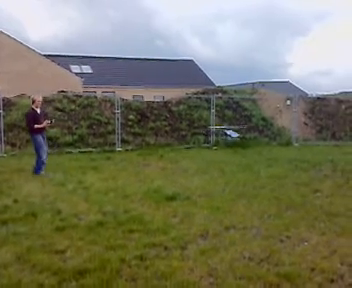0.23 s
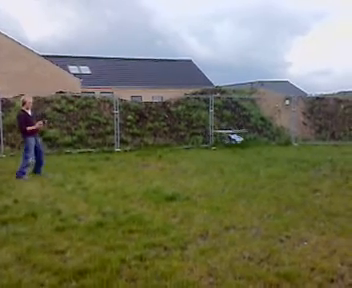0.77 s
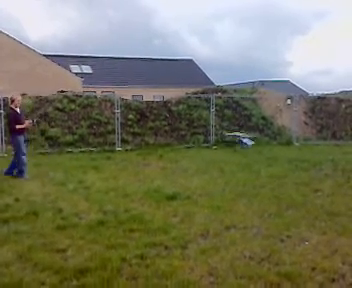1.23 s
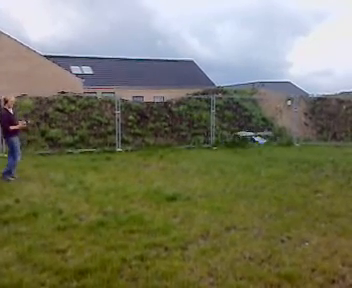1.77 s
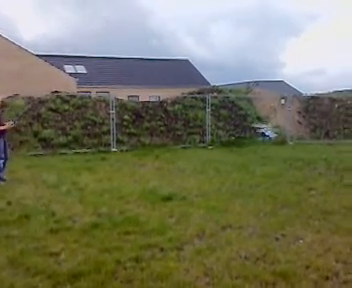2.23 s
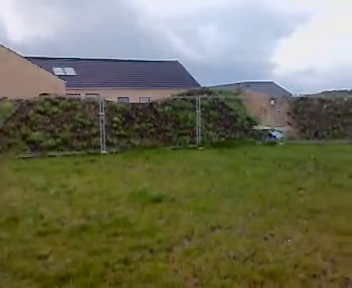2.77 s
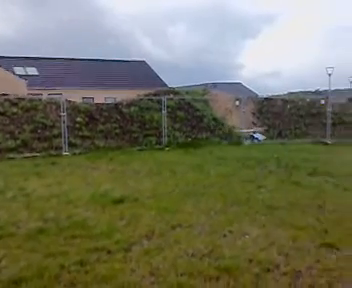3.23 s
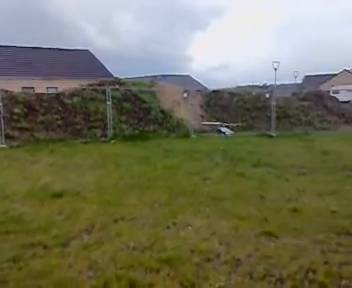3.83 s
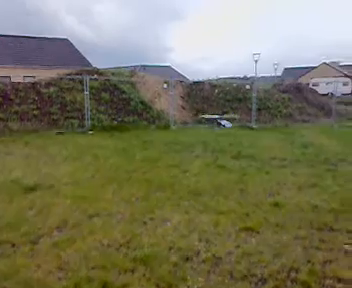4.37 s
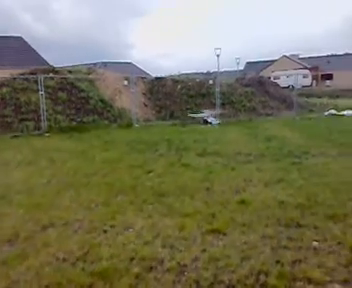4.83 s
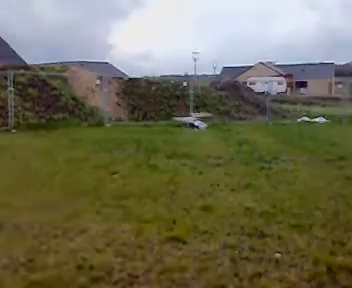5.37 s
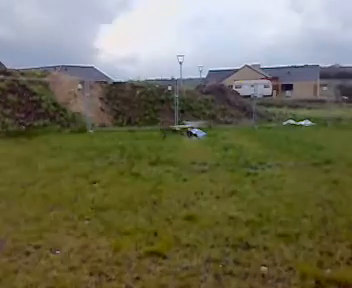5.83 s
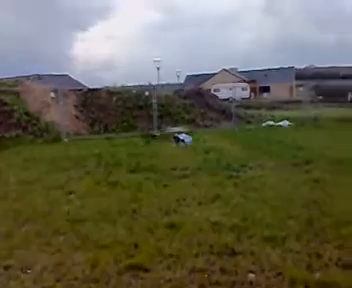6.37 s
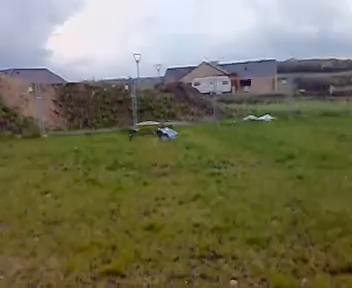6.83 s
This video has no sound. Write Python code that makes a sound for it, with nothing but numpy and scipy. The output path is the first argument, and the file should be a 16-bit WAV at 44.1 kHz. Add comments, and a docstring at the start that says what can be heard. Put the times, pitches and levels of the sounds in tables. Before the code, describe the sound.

A small electric model helicopter is already flying at 0 s, about twelve metres off over open grass, and continues to the end at 7 s. Its dominant sound is a shrill, nearly steady gear whine around 5.5 to 6 kHz, two close tones quivering at rotor speed, with a fast raspy buzz of rubbing teeth. Under it are hissing blade rush, fuzzy mid-low chop, faint motor hum and a weak low throb beating about once a second. A wind bump hits at 0-0.3 s. The whine softens near 2.5-2.8 s while the chop swells as the craft swings round, then recovers by 3.2 s. Ground reflections slide its hollow colour. Gusts rumble around 3.2, 4 and 5 s; stronger thumps come at 5.6-5.7 s and smaller ones at 6.4-6.8 s. From 5.2 s it draws nearer, louder and sharper. The small camera microphone sounds thin, dull above 9 kHz.

```python
"""Electric model helicopter over grass

A small electric model helicopter hovers and drifts low over a grass field, slowly coming nearer.
Meshing gears give tones that throb once a rotor turn, and their rubbing teeth give rasping noise strokes.
Blades give pulsed noise, fuzzy chop and a low beating tone; tail rotor and motor add clean tones.
A delayed ground echo combs most of it as the craft moves.
Wind is rumbling noise with gusts, and eddies thump the microphone of a small camera."""
import sys
import numpy as np
from scipy.fft import rfft, irfft, next_fast_len
from scipy.io import wavfile
from scipy.ndimage import map_coordinates

SR = 44100
rng = np.random.default_rng(int(sys.argv[2]) if len(sys.argv) > 2 else 0)


def transcribe(u):
    """Save the signal u as a 16-bit wav file named by the first command-line argument.

    u: samples, shape (n,) or (channels, n), limited to [-1, 1]; the rate is SR.
    q: integer samples, one column per channel.
    """
    v = np.clip(np.atleast_2d(u).T, -1, 1)
    q = np.round(v * 32767).astype(np.int16)
    wavfile.write(sys.argv[1], SR, q)


N = 312669  # samples

# main rotor speed: time_s, speed_turns_per_s
ROTOR_SPEED = [(0.0, 36.99), (0.4, 37.105), (0.75, 37.115), (1.28, 36.963), (1.58, 37.101), (1.95, 37.112),
               (2.3, 36.952), (2.6, 37.037), (2.87, 37.218), (3.2, 37.186), (3.8, 37.212), (4.2, 37.3),
               (4.75, 37.31), (5.2, 37.388), (6.1, 37.452), (6.8, 37.301), (7.09, 37.176)]
# flight path: time_s, ground_echo_lag_ms, gears_facing_camera_db
FLIGHT_PATH = [(0, 1.318, -3), (.4, 1.326, -1), (.75, 1.253, -.4), (1, 1.218, -.6), (1.2, 1.128, -1.3),
               (1.55, 1.083, -.3), (2.05, 1.097, -2.3), (2.45, 1.178, -4), (2.75, 1.26, -4.4),
               (3.2, 1.276, -.6), (3.6, 1.276, -1.1), (4.4, 1.243, 2.1), (5.05, 1.286, 1.4),
               (5.45, 1.297, -1.2), (6.1, 1.39, 3.6), (7.09, 1.516, 4.6)]
# approach of the craft: time_s, distance_m
APPROACH = [(0, 12), (2, 11.6), (2.8, 10), (5.2, 9.8), (6.2, 7.6), (7.09, 7)]
# gear tones, main mesh at 150 and tail drive near 161: frequency_per_rotor_speed, level_db (before
# nearness and facing), rotor_throb_0_to_1, phase_sway_rad, motor_throb_0_to_1 (also its phase sway in rad)
GEAR_TONES = [(150, -35.5, .18, .6, .56), (160.72, -38.3, .55, 1.2, .1), (75, -52.7, .2, .4, .3),
              (81, -59, .2, .4, .3), (122.57, -57, .3, 1, .1), (130.57, -55, .3, .9, .1),
              (139.3, -53, .3, 1, .1), (141.3, -54, .3, 1, .1), (156.73, -45.5, .3, .7, .1),
              (166.72, -55, .3, .7, .1), (173.44, -54, .3, 1, .2), (179.44, -57, .3, 1, .1),
              (184.15, -58, .3, 1, .1)]
# clean tail rotor and motor tones: frequency_per_rotor_speed, level_db (before the gear gain),
# gain_db_per_gear_db
HUM_TONES = [(3.96, -69.5, .5), (8.02, -68.5, 1.4), (8.78, -68, .5), (10.71, -67, .84), (13.02, -63, .74),
             (18.43, -59, -.2), (21.43, -55.8, .45), (27.14, -61, 0), (36, -60, .3), (42, -59, .2),
             (43, -54.5, 0), (46, -57.5, 0), (47.97, -50, -.6), (84, -57, .5)]
# tail blades chopping the main rotor's wake: frequency_per_rotor_speed, width_hz, relative_level_db
TAIL_CHOP = [(17.72, 35, -4), (26.4, 50, -6), (35.6, 65, -2.5), (43.74, 110, 1), (62.5, 120, -4)]
# low drone beating with the blade tone: time_s, offset_above_blade_tone_hz, level_db
DRONE_PATH = [(0, .92, -57.5), (1.8, .95, -56), (2.7, 1.22, -61), (3.8, 1.55, -56), (4.8, 1.13, -52.5),
              (7.09, 1.2, -55)]
# narrow swells in the rush of the rotors: centre_s, spread_s, pitch_hz, width_hz, level_db
RUSH_SWELLS = [(1.85, .4, 1040, 70.4, -51.5), (2.8, 0.18, 631, 69.6, -51), (2.785, 0.2, 1664, 130.4, -46),
               (5.95, .42, 2830, 95, -43), (1.2, .4, 1780, 90, -50.5)]
# gusts that swell the rumble: centre_s, spread_s, level_db
WIND_GUSTS = [(0, .06, -40), (.22, .18, -50), (3.24, .08, -45), (3.92, .24, -45), (4.92, .22, -48.5),
              (5.66, .11, -44.5), (6.65, .34, -43.5)]
# eddies that thump the microphone: centre_s, level_db, spread_s, push_pitch_hz
EDDY_THUMPS = [(.194, -30.5, .009, 72), (.25, -38.5, .012, 75), (4.068, -48, .026, 70),
               (5.64, -30.7, .014, 62), (5.707, -32.5, .02, 58), (6.407, -37.5, .015, 50),
               (6.658, -42, .022, 70), (6.782, -34, .013, 150)]
# spectrum of air rushing over the blades: frequency_hz, relative_level_db_per_hz
SWISH_SPECTRUM = [(60, -26.5), (170, -4.5), (300, -11), (450, -9.5), (620, -5.5), (900, -4.5), (1200, -3),
                  (1700, 0), (2100, 0), (2700, -0.5), (3200, 0), (4000, 0), (6000, -24.5)]
# spectrum of the rubbing teeth: frequency_hz, relative_level_db_per_hz
RASP_SPECTRUM = [(3000, -45.5), (4000, -19), (4550, -5), (5000, -2.5), (5450, -0.5), (5850, 5.5),
                 (6250, -6.5), (6700, 3), (7400, -6.5), (9000, -11)]
# spectrum of the wind rumble: frequency_hz, relative_level_db_per_hz
RUMBLE_SPECTRUM = [(15, -17), (28, 3), (50, 1), (90, -1), (160, -18), (260, -22), (500, -33.5),
                   (2000, -70.5)]
# spectrum of the turbulence inside each thump: frequency_hz, relative_level_db_per_hz
BUFFET_SPECTRUM = [(20, -15.5), (45, -2), (95, -1), (145, -6), (220, -11), (330, -24), (600, -49),
                   (2000, -72.5)]
# spectrum of the open field: frequency_hz, relative_level_db_per_hz
FIELD_SPECTRUM = [(20, -7), (80, 0), (200, -3.5), (400, -16), (1500, -18), (8000, -39)]
# camera microphone, with a notch from its port: frequency_hz, gain_db
MICROPHONE_RESPONSE = [(3200, 1), (3400, -3), (3600, -16.5), (3850, -11.5), (4300, 2.5), (7300, -1),
                       (7700, -8), (8000, -28), (8450, -15.5), (9000, -23.5)]
TOP_HZ = 9050  # band limit of the camera

SWISH_DB, RASP_DB, THRUM_DB = -41.6, -37.9, -56.8  # at the starting distance
CHOP_DB, CHOP_DB_PER_NEAR_DB = -53.8, .4  # tail chop at the start, and its gain per dB of nearness
TURN_S, TURN_SPREAD_S, TURN_DB = 2.8, .4, 3.5  # the tail chops harder as the craft swings round
CALM_DB, FIELD_DB = -60, -57.5  # rumble between the gusts, and the open field


def amp(db):
    """Logarithmic level: decibels become an amplitude gain."""
    return 10 ** (np.asarray(db) / 20)


def unit(x):
    """Power normalisation: scale to rms 1."""
    return x / np.sqrt(np.mean(np.abs(x) ** 2) + 1e-20)


def curves(rows):
    """Linear interpolation: one value per sample for each column after the time."""
    s, *cols = np.transpose(rows)
    return [np.interp(np.arange(N) / SR, s, c) for c in cols]


def wobble(rate):
    """Band-limited fluctuation: a smooth random curve with rate knots a second."""
    knots = rng.standard_normal(int(N * rate / SR) + 4)
    return map_coordinates(knots, [np.arange(N) * rate / SR])


def filtered(x, response):
    """Linear filtering: multiply the spectrum of x by a response of frequency."""
    m = next_fast_len(N + 8192)
    return irfft(rfft(x, m) * response(np.fft.rfftfreq(m, 1 / SR)), m)[:N]


def coloured(x, points):
    """Spectral shaping: (Hz, dB) points joined on a log frequency axis filter x."""
    f, db = np.transpose(points)
    return filtered(x, lambda hz: amp(np.interp(np.log(hz + 1), np.log(f), db)))


def noise(points):
    """Shaped random noise: rms 1 with the given spectrum."""
    return unit(coloured(rng.standard_normal(N), points))


def swell(s, spread):
    """Gaussian envelope: a bell-shaped rise and fall around time s, spread being its standard deviation."""
    return np.exp(-.5 * ((np.arange(N) / SR - s) / spread) ** 2)


def narrow(cycles, width):
    """Narrow-band noise: random modulation widens a tone that follows the cycle count; rms 1."""
    envelope = wobble(width) + 1j * wobble(width)
    return unit(np.real(envelope * np.exp(2j * np.pi * cycles)))


def throb(turns, count, depth_db, at):
    """Amplitude modulation: a gain of rms 1 swells count times a turn, one peak at part `at` of the turn."""
    return unit(amp(depth_db * np.cos(2 * np.pi * count * (turns - at))))


def whine(turns, tight_at, sway_at, flutter_db):
    """Gear meshing: a wheel out of true modulates each tone's size and phase once a rotor turn."""
    wheel = np.cos(2 * np.pi * (turns - tight_at))
    swing = np.sin(2 * np.pi * (turns - sway_at))
    # the motor's pinion turns six times as fast and adds a flutter of its own
    pinion = np.cos(2 * np.pi * 6 * (turns - tight_at))
    out = np.zeros(N)
    for multiple, db, wheel_throb, sway, motor_throb in GEAR_TONES:
        size = amp(db + flutter_db * wobble(8.3))
        size = size * (1 + wheel_throb * wheel) * (1 + motor_throb * pinion)
        phase = 2 * np.pi * multiple * turns + sway * swing - motor_throb * pinion
        out += size * np.sin(phase)
    return out


def rasp(turns, repeat_db, sweep_ms, mesh_hz):
    """Friction and dispersion: teeth rub once a motor turn, hardest at the wheel's tight spot."""
    # the teeth's flaws come round with every rotor turn
    flaws = rng.standard_normal(size=1024)
    repeating = map_coordinates(flaws, [turns % 1 * len(flaws)], mode="grid-wrap")
    tight_spot = throb(turns, count=1, depth_db=4.5, at=.07)
    strokes = tight_spot * throb(turns, count=6, depth_db=5, at=-.005)
    roughness = rng.standard_normal(N) + amp(repeat_db) * repeating
    rub = coloured(strokes * roughness, RASP_SPECTRUM)

    # bending waves in the frame spread each stroke into a short rising chirp
    def dispersion(hz):
        advance_s = sweep_ms / 1000 * np.clip(1 - hz / mesh_hz, -.25, 1)
        return np.exp(2j * np.pi * np.cumsum(advance_s) * hz[1])

    return unit(filtered(rub, dispersion))


def blades(turns):
    """Aerodynamic noise: air rushes over the blades, and the tail rotor chops it into fuzzy tones."""
    swish = noise(SWISH_SPECTRUM) * throb(turns, count=2, depth_db=1.5, at=0.25)
    chop = sum(amp(db) * narrow(multiple * turns, width) for multiple, width, db in TAIL_CHOP)
    return swish, chop


def thrum(turns, near_db, cancel_at):
    """Blade passing and beats: two blades pass each turn, and a drone slightly above beats with their tone."""
    above_hz, drone_db = curves(DRONE_PATH)
    beats = np.cumsum(above_hz) / SR - cancel_at
    blade_tone = amp(THRUM_DB + near_db) * np.sin(2 * np.pi * 2 * turns)
    drone = amp(drone_db) * np.sin(2 * np.pi * (2 * turns + beats))
    return blade_tone - drone


def hum(turns, gear_db, flutter_db):
    """Rotational tones: tail rotor and motor sound unsteady in turbulent air; most grow with the gears."""
    out = np.zeros(N)
    for multiple, db, share in HUM_TONES:
        size = amp(db + share * gear_db + flutter_db * wobble(6.2))
        out += size * np.sin(2 * np.pi * (multiple * turns + rng.random()))
    return out


def over_ground(x, lag_ms, bounce):
    """Comb filtering: the grass returns a slightly later copy, whose comb slides as the craft moves."""
    return x + bounce * map_coordinates(x, [np.arange(N) - lag_ms * SR / 1000], mode="nearest")


def swells():
    """Narrow-band emphasis: now and then one narrow band of the rush stands out."""
    t = np.arange(N) / SR
    return sum(amp(db) * swell(s, spread) * narrow(hz * t, width)
               for s, spread, hz, width, db in RUSH_SWELLS)


def helicopter():
    """Geared rotation and inverse distance: all turning parts follow the rotor; most grow with nearness."""
    turns = np.cumsum(curves(ROTOR_SPEED)[0]) / SR
    lag_ms, facing_db = curves(FLIGHT_PATH)
    metres, = curves(APPROACH)
    near_db = 20 * np.log10(metres[0] / metres)
    gear_db = near_db + facing_db
    chop_db = CHOP_DB + CHOP_DB_PER_NEAR_DB * near_db + TURN_DB * swell(TURN_S, TURN_SPREAD_S)

    tones = amp(gear_db) * whine(turns, tight_at=0.031, sway_at=0.18, flutter_db=.9)
    teeth = amp(RASP_DB + near_db) * rasp(turns, repeat_db=-2.5, sweep_ms=20, mesh_hz=5664)
    swish, chop = blades(turns)
    rotors = amp(SWISH_DB + near_db) * swish + amp(chop_db) * chop
    rotors += thrum(turns, near_db, cancel_at=.09) + hum(turns, gear_db, flutter_db=.8)

    # the parts sit at different heights, so the rasp combs less
    craft = over_ground(tones, lag_ms, bounce=0.74)
    craft += over_ground(teeth, lag_ms, bounce=0.28)
    craft += over_ground(rotors, lag_ms, bounce=0.38)
    return craft + swells()


def wind():
    """Turbulent pressure: lumpy rumble swells with gusts, and eddies push the microphone and break up."""
    t = np.arange(N) / SR
    gust_power = sum((amp(db) * swell(s, spread)) ** 2 for s, spread, db in WIND_GUSTS)
    strength = np.sqrt(amp(CALM_DB) ** 2 + gust_power)
    rumble = strength * unit(amp(1.3 * wobble(18)) * noise(RUMBLE_SPECTRUM))
    eddies = amp(-1.5) * noise(BUFFET_SPECTRUM)
    thumps = np.zeros(N)
    for s, db, spread, hz in EDDY_THUMPS:
        push = np.sin(2 * np.pi * hz * (t - s))
        thumps += amp(db) * swell(s, spread) * (push + eddies)
    field = amp(FIELD_DB) * noise(FIELD_SPECTRUM)
    return rumble + thumps + field


def scene():
    """Superposition: the helicopter and the wind add."""
    return (helicopter() + wind())[None]


def record(dry):
    """Band limitation: the camera's microphone colours the sound, and nothing passes above its limit."""
    return filtered(coloured(dry[0], MICROPHONE_RESPONSE), lambda hz: hz < TOP_HZ)[None]


dry = scene()
out = record(dry)
transcribe(out)
```